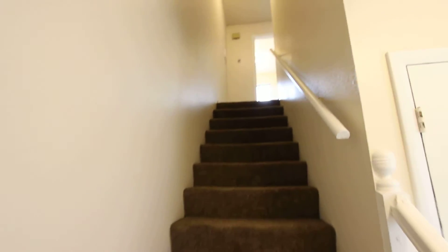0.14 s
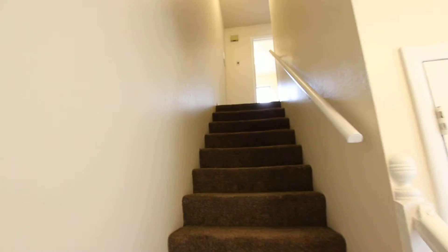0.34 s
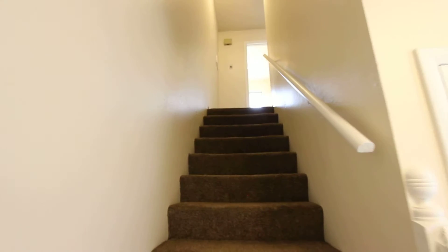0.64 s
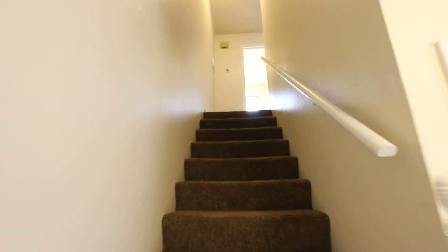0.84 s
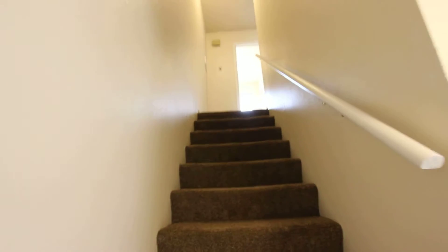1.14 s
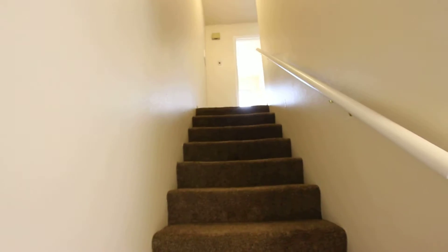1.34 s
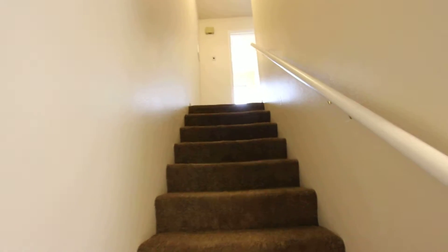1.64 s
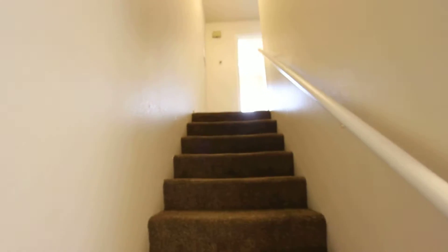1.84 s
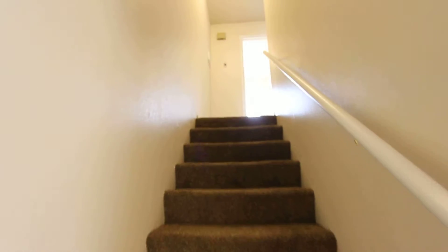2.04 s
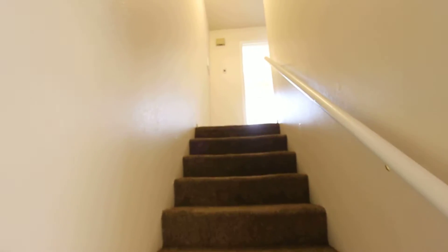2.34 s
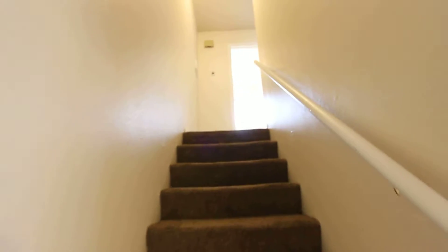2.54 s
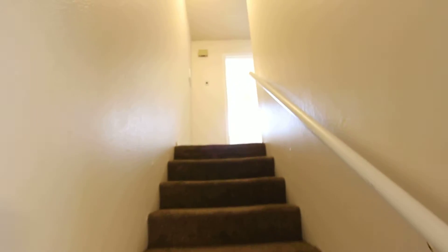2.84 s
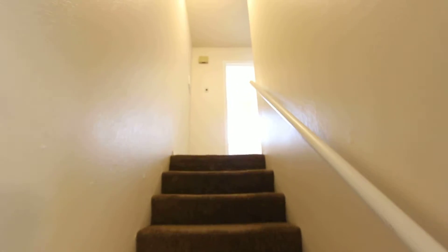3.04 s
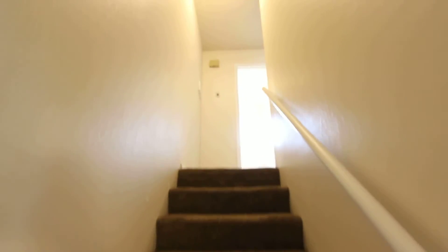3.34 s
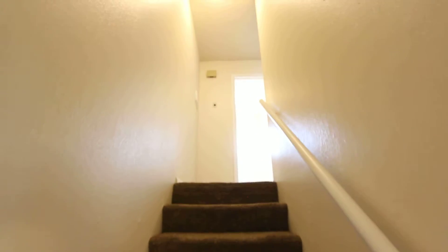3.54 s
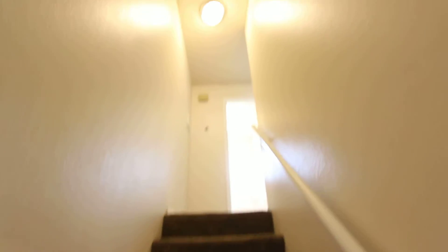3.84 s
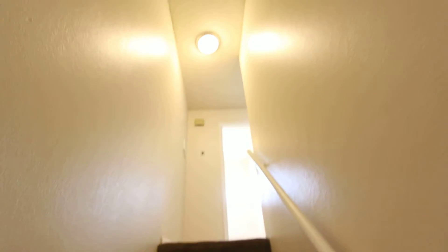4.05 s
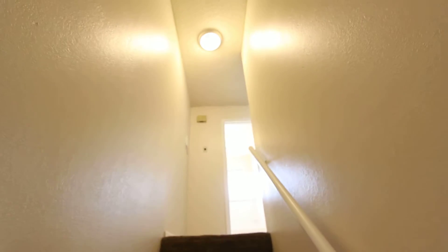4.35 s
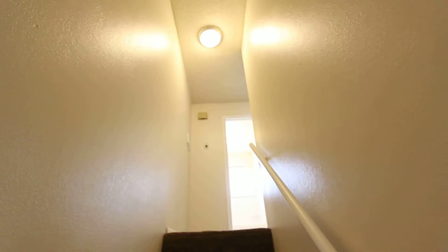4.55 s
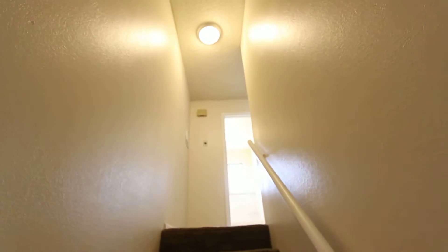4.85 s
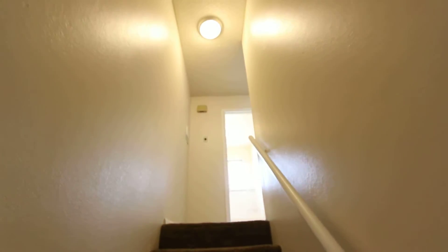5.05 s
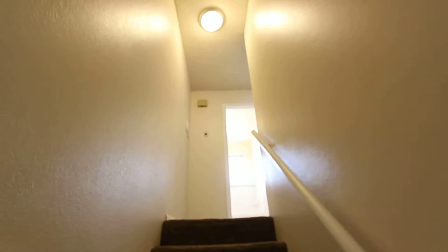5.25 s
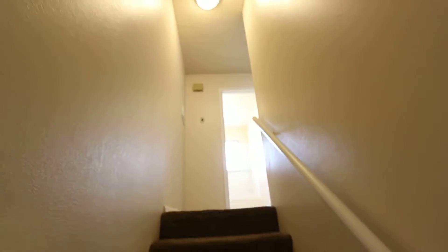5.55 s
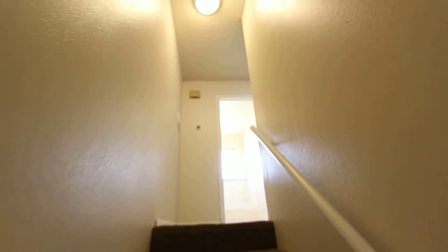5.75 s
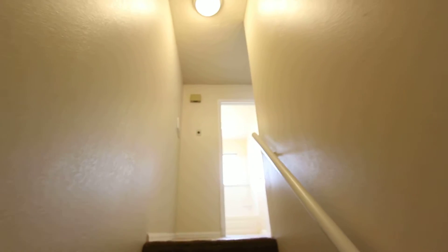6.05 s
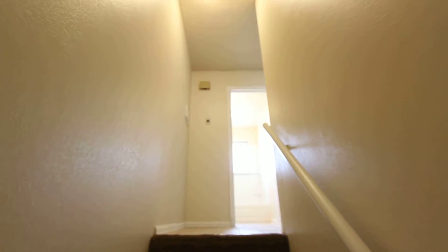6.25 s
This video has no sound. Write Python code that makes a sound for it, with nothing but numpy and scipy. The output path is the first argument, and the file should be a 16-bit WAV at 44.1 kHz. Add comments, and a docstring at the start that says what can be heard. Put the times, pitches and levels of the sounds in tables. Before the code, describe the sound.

Close dry clacks, light rattly ticks and one brief metallic clatter from a carried device, with dull footfalls on carpet and quiet bassy handling rumble.

```python
"""Someone climbs carpeted stairs with a camera in the hand: hand rumble and microphone hiss throughout.
A first knock of a loose part on the shell at 0.2 s; then light ticks and soft thuds of feet and hand.
At 1.7 s the hiss dips briefly and a loose part clatters; a knock at 3.0 s, two squeaks at 3.3 s.
Knocks and ticks crowd around 4.0 s, ticks again from 5.1 s; a last knock and the strongest thud at 6.0 s.
Blows drive the decaying modes of shell and metal; the other sources are shaped noise, taps and pulses."""
import sys
import numpy as np
from scipy import signal
from scipy.fft import rfft, irfft
from scipy.io import wavfile
from scipy.ndimage import uniform_filter1d

SR = 44100
rng = np.random.default_rng(int(sys.argv[2]) if len(sys.argv) > 2 else 0)


def log_audio(samples):
    """Write samples as a 16-bit WAV file to the path given in sys.argv[1]."""
    # one column per channel
    frames = np.atleast_2d(samples).T
    # limit to full scale, then quantise
    limited = np.clip(frames, -1, 1)
    pcm = np.round(limited * 32767).astype(np.int16)
    wavfile.write(sys.argv[1], SR, pcm)


N = 282681

# heavy blows on the shell: (time [s], force [dB], low edge [Hz], high for a light part,
# high edge [Hz], high for a hard contact, pitch of the striking part [Hz], its ring [dB], rebound delay [s])
KNOCK_EVENTS = [(0.2092, -0.5, 58.6, 1680, 520, -9, 0.00064), (3.0159, -1.5, 40, 1980, 1580, -35, 0.0019),
                (3.8995, 1.5, 300, 3280, 960, 3.5, 0.0012), (3.9653, -0.8, 60, 2100, 2490, -14, 0.00239),
                (4.022, 5.5, 112, 1680, 2370, 6.5, 0.0022), (6.0136, 1.6, 129, 1620, 930, 8, 0.0016)]
# light ticks of small loose parts: (time [s], force before gain [dB], pitch of the part [Hz])
TICK_EVENTS = [(0.5985, -28.5, 1750), (0.9515, -30.5, 1780), (1.0177, -16.5, 1940), (1.3777, -29.5, 1770),
               (2.0718, -25, 1810), (2.826, -17, 2100), (2.9739, -11, 2080), (3.231, -25.5, 1880),
               (3.773, -23.5, 1960), (3.951, -19, 2470), (4.0037, -8, 2000), (4.02, -1.5, 2600),
               (4.0408, -11, 2280), (4.0473, -6, 2330), (5.118, -16, 1650), (5.1218, -9, 2590),
               (5.185, -27, 1890), (5.2833, -20, 2380), (5.4593, -26, 1880), (5.4714, -11, 2740),
               (5.5333, -16.5, 2770), (6.2284, -21, 1780), (6.2397, -22.5, 2390)]
# modes of the camera's shell: (frequency [Hz], level [dB], t60 [s])
SHELL_MODES = [(103, -17.5, 0.029), (245.7, -25, 0.069), (302, -27.5, 0.038), (414, -24.5, 0.042),
               (500, -17.5, 0.024), (566, -30, 0.071), (789, -31, 0.062), (907, -20, 0.013),
               (1200, -21, 0.021), (1430, -15, 0.013), (1590, -20, 0.028), (2018, -32.5, 0.057),
               (2334, -16.5, 0.012), (2596, -21, 0.022), (3484, -25.5, 0.033)]
# modes of a metal part that rings on after a blow: (frequency [Hz], relative level [dB], t60 [s])
METAL_MODES = [(535, -6.5, 0.46), (680, -1, 0.16), (930, -12, 0.24), (1203, -4, 0.6), (1428, -10, 0.74),
               (1677, -3, 0.66), (1680, -4, .42), (1745, -10, 0.48), (3120, -7.5, 0.26)]


def amp(db):
    """Amplitude ratio of a level in dB."""
    return 10 ** (np.asarray(db) / 20)


def evened(x):
    """Scales to rms 1."""
    return x / np.sqrt(np.mean(x ** 2) + 1e-20)


def level(rows):
    """Gain over time from rows of (time [s], level [dB])."""
    return amp(np.interp(np.arange(N) / SR, *np.transpose(rows)))


def add(mix, start_s, sound):
    """Mixes a sound in at start_s, in place."""
    part = mix[round(start_s * SR):][:len(sound)]
    part += sound[:len(part)]


def colour(x, points):
    """Weights the spectrum of x by (frequency [Hz], level [dB]) points, at rms 1."""
    hz, db = np.transpose(points)
    log_hz = np.log(np.fft.rfftfreq(len(x), 1 / SR) + 1)
    shape_db = np.interp(log_hz, np.log(hz), db)
    return evened(irfft(rfft(x) * amp(shape_db), len(x)))


def cut(x, hz, kind, order):
    """Butterworth low-pass or high-pass."""
    sos = signal.butter(order, min(hz, SR / 2 - 1), kind, fs=SR, output="sos")
    return signal.sosfilt(sos, x)


def resonate(x, hz, width_hz):
    """One resonance of peak gain 1."""
    b, a = signal.iirpeak(hz, hz / width_hz, fs=SR)
    return signal.lfilter(b, a, x)


def fade(t, t60):
    """Exponential decay, 60 dB down at t60."""
    return np.exp(-np.log(1000) * t / t60)


def ring(x, modes):
    """Drives a set of exponentially decaying modes with x."""
    t = np.arange(SR) / SR
    response = sum(amp(db) * fade(t, t60) * np.cos(2 * np.pi * hz * t) for hz, db, t60 in modes)
    return signal.fftconvolve(x, response)[:N]


def scatter(x, t60, low_hz):
    """A dense, dying train of tiny repeats of x, without bass."""
    t = np.arange(SR // 2) / SR
    tail = cut(rng.standard_normal(len(t)), low_hz, "highpass", order=2) * fade(t, t60)
    return signal.fftconvolve(x, tail / np.linalg.norm(tail))[:N]


def push(db, low_hz, high_hz, part_hz, part_db, part_q=9, stiff_share=0.71):
    """Force of one contact: a push as short as the contact is hard, with the buzz of the striking part."""
    force = cut(signal.unit_impulse(SR // 10), low_hz, "highpass", order=2)
    force = cut(force, high_hz, "lowpass", order=3)
    force = cut(force, stiff_share * low_hz, "highpass", order=2)  # a light part hardly moves the low modes
    buzz = amp(part_db) * resonate(force, part_hz, part_hz / part_q)
    return -amp(db) * (force + buzz)


def hiss(rms_db=-56.5, split_hz=5600, bass_dip_db=-8, treble_dip_db=-23):
    """Steady noise of room and microphone; one brief dip, deepest in the treble, falls fast and recovers slowly."""
    # spectrum: (frequency [Hz], relative density [dB per Hz])
    hiss_spectrum = [(60, 3.5), (300, -1.5), (700, -1.5), (1500, -3), (3000, -5), (5000, -8.5), (8000, -11),
                     (11000, -12.5), (16000, -11)]
    dip_start_s, fall_s, hold_s, recover_s = 1.661, 0.005, 0.014, 0.039
    noise = amp(rms_db) * colour(rng.standard_normal(N), hiss_spectrum)
    split = signal.butter(2, min(split_hz, SR / 2 - 1), fs=SR, output="sos")
    bass = signal.sosfiltfilt(split, noise)
    treble = noise - bass
    corners_s = np.cumsum([dip_start_s, fall_s, hold_s, recover_s])
    dip = np.interp(np.arange(N) / SR, corners_s, [0, 1, 1, 0])
    return bass * amp(bass_dip_db * dip) + treble * amp(treble_dip_db * dip)


def rumble(gain_db=1, steady_s=0.117):
    """Low shudder of the hand on the camera: coloured noise swelling with the movement."""
    # movement: (time [s], level before gain [dB])
    hand_levels = [(0.0, -40.5), (1.66, -42.5), (1.82, -37.5), (1.87, -44.5), (2.84, -41.5), (2.95, -46),
                   (3.02, -36), (3.39, -43.5), (3.45, -38.5), (3.52, -41.5), (4.39, -36.5), (4.59, -43.5),
                   (5.43, -37.5), (5.8, -41.5), (6.12, -34.5), (6.41, -45.5)]
    # spectrum: (frequency [Hz], relative density [dB per Hz])
    rumble_spectrum = [(5, -14.5), (20, 4), (35, -2), (60, -6), (100, -14), (160, -24), (250, -34.5),
                       (500, -45), (1500, -82)]
    noise = colour(rng.standard_normal(N), rumble_spectrum)
    noise /= np.sqrt(uniform_filter1d(noise ** 2, round(steady_s * SR)))  # leaves the swells to the hand
    return amp(gain_db) * noise * level(hand_levels)


def fidgets(low_hz=1400, high_hz=3200, peak_db=-36, touches_per_s=3):
    """Very light touches of the loose parts on the shell at random moments, ringing its modes."""
    touches = amp(peak_db) * (rng.random(N) < touches_per_s / SR) * rng.uniform(.5, 1, N)
    force = cut(cut(touches, low_hz, "highpass", order=3), high_hz, "lowpass", order=4)
    return ring(force, SHELL_MODES)


def squeaks(width_hz=350):
    """Short, thin whistles of something rubbing: noise through two equal resonances."""
    # faint squeaks: (time [s], length [s], pitch [Hz], rms level before the window [dB])
    squeak_events = [(3.324, 0.046, 8650, -61), (3.344, 0.029, 5800, -58.5)]
    out = np.zeros(N)
    for start_s, length_s, hz, db in squeak_events:
        noise = rng.standard_normal(round(length_s * SR))
        whistle = resonate(resonate(noise, hz, width_hz), hz, width_hz)
        add(out, start_s, amp(db) * evened(whistle) * np.hanning(len(noise)))
    return out


def thuds(push_db=-7, scuff_top_hz=900, padding=4, scuff_cycles=8.5):
    """Feet and hand: a padded push with no ring, and a puff of dull scuffing, longer for slow steps."""
    # soft thuds: (time [s], force [dB], body [Hz], scuff relative to force [dB])
    thud_events = [(0.708, -23, 79, -21.5), (2.454, -26, 127, -44), (3.406, -34, 171, -10.5),
                   (4.153, -21, 139, -21.5), (4.4535, -30, 204, -11), (5.525, -16.5, 136, -23),
                   (6.034, -1.5, 113, -34.5)]
    out, t = np.zeros(N), np.arange(SR // 4) / SR
    for start_s, db, body_hz, scuff_db in thud_events:
        phase = 2 * np.pi * body_hz * t
        pulse = phase * (2 - phase) * np.exp(-phase)
        body = -amp(push_db) * cut(pulse, padding * body_hz, "lowpass", order=2)
        noise = evened(cut(rng.standard_normal(len(t)), scuff_top_hz, "lowpass", order=3))
        build_up = 1 - np.exp(-phase)
        scuff = noise * fade(t, scuff_cycles / body_hz) * build_up
        add(out, start_s, amp(db) * (body + amp(scuff_db) * scuff))
    return out


def clatter(taps_per_s=2500, metal_db=-13, tail_db=-15, top_hz=4200):
    """Tiny taps of a loose part swell, hold and die; at full height they strike the metal; a gritty tail follows."""
    # spectrum: (frequency [Hz], relative density [dB per Hz])
    clatter_spectrum = [(150, -41), (300, -23), (520, -9.5), (800, -12), (980, 1.5), (1150, -5), (1650, -2),
                        (2300, -18), (3100, -14), (3800, -27), (5000, -42), (8000, -80)]
    start_s, rise_s, hold_s, release_t60_s = 1.684, 0.014, 0.0047, 0.054
    burst_db, start_db = -34.5, -2.5  # start_db relative to full height
    taps = rng.choice([-1, 1], N) * (rng.random(N) < taps_per_s / SR)
    t = np.arange(N) / SR - start_s
    swell = (t > 0) * amp(burst_db + start_db * np.clip(1 - t / rise_s, 0, 1))
    release = fade(np.maximum(t - rise_s - hold_s, 0), release_t60_s)
    burst = colour(taps, clatter_spectrum) * swell * release
    strike = amp(burst_db + metal_db) * signal.unit_impulse(N, round((start_s + rise_s) * SR))
    tail = amp(tail_db) * scatter(burst, t60=0.39, low_hz=1200)
    return cut(burst + ring(strike, METAL_MODES) + tail, top_hz, "lowpass", order=6)


def snaps(t60=0.0079, low_hz=3800, high_hz=5800, gain_db=6):
    """Gritty treble where two hard edges meet: decaying noise, louder for strong and hard contacts."""
    # relative to force, before gain; a knock's snap grows with the hardness of the contact
    knock_snap_db, hard_hz, db_per_octave = -34, 3050, 38
    tick_snap_db = -32.5
    contacts = []
    for start_s, force_db, _, edge_hz, *_ in KNOCK_EVENTS:
        hardness_db = db_per_octave * np.log2(edge_hz / hard_hz)
        contacts.append((start_s, force_db + knock_snap_db + hardness_db))
    contacts += [(start_s, force_db + tick_snap_db) for start_s, force_db, _ in TICK_EVENTS]
    out, t = np.zeros(N), np.arange(SR // 20) / SR
    for start_s, db in contacts:
        add(out, start_s, amp(db) * rng.standard_normal(len(t)) * fade(t, t60))
    return amp(gain_db) * cut(cut(out, low_hz, "highpass", order=2), high_hz, "lowpass", order=3)


def ticks(top_hz=4200, longest_t60=0.03, grit_db=-12, grit_t60=0.01):
    """A light part touches, rebounds once and grates; resting on the shell, it stops the longer modes."""
    low_hz, edge_ratio, part_ring_db, gain_db = 1610, 1.07, 3, -1.5  # high edge = edge_ratio * pitch
    rebound_s, rebound_db = 0.001085, -10
    force = np.zeros(N)
    for start_s, db, part_hz in TICK_EVENTS:
        tick = push(db + gain_db, low_hz, edge_ratio * part_hz, part_hz, part_ring_db)
        add(force, start_s, tick)
        add(force, start_s + rebound_s, amp(rebound_db) * tick)
    damped = [(hz, db, min(t60, longest_t60)) for hz, db, t60 in SHELL_MODES]
    shell = cut(ring(force, damped), top_hz, "lowpass", order=6)
    return shell + amp(grit_db) * scatter(shell, grit_t60, low_hz=500)


def knocks(top_hz=3900, chatter_db=-17, metal_db=-48, mount_hz=1150, rebound_db=-14):
    """Each blow rebounds once, rings the shell, chatters and rings the metal part through its soft mount."""
    force = np.zeros(N)
    for start_s, db, low_hz, high_hz, part_hz, part_db, rebound_s in KNOCK_EVENTS:
        knock = push(db, low_hz, high_hz, part_hz, part_db)
        add(force, start_s, knock)
        add(force, start_s + rebound_s, amp(rebound_db) * knock)
    shell = cut(ring(force, SHELL_MODES), top_hz, "lowpass", order=6)  # the shell passes little treble
    chatter = amp(chatter_db) * scatter(shell, t60=0.085, low_hz=500)
    mounted = cut(force, mount_hz, "lowpass", order=2)
    metal = amp(metal_db) * ring(mounted, METAL_MODES)
    return shell + chatter + metal


def scene(stairwell_db=-32, echo_top_hz=2200):
    """Close sounds with a faint diffuse echo of the narrow stairwell, dulled by carpet; rumble and hiss stay dry."""
    close = fidgets() + squeaks() + thuds() + clatter() + snaps() + ticks() + knocks()
    echo = scatter(close, t60=0.36, low_hz=597)
    echo = amp(stairwell_db) * cut(echo, echo_top_hz, "lowpass", order=2)
    return (close + echo + rumble() + hiss())[None]


def record(dry, ceiling=.93, edge_hz=15950):
    """Smooth saturation rounds off peaks near the ceiling; a linear-phase low-pass sets the band limit."""
    rounded = dry / (1 + (dry / ceiling) ** 8) ** (1 / 8)
    band_limit = signal.firwin(511, edge_hz, window=("kaiser", 9), fs=SR)
    return signal.oaconvolve(rounded, band_limit[None], "same")


dry = scene()
out = record(dry)
log_audio(out)
```